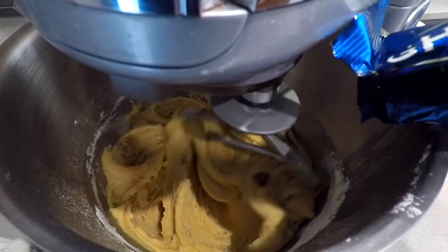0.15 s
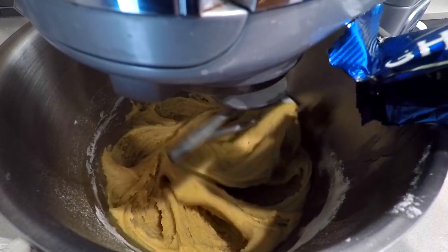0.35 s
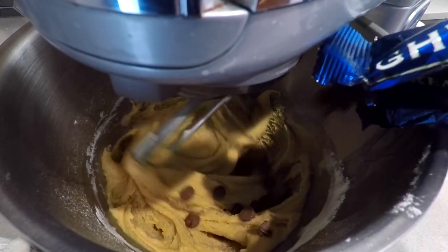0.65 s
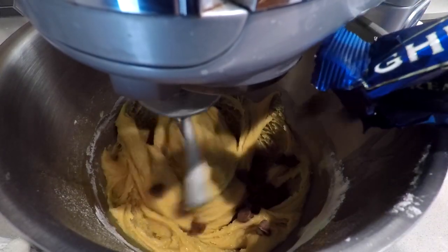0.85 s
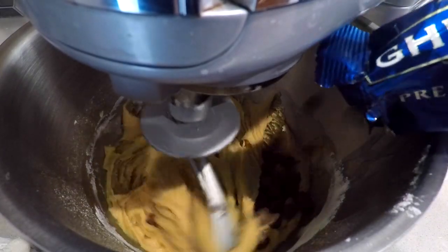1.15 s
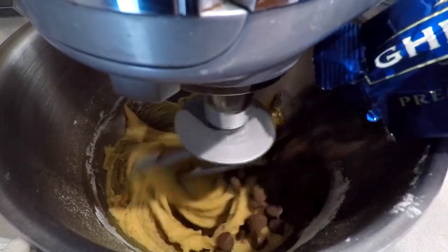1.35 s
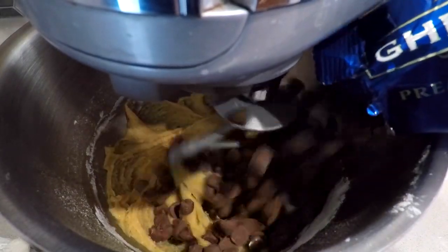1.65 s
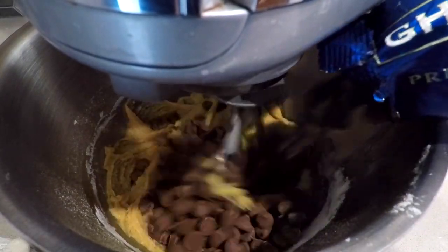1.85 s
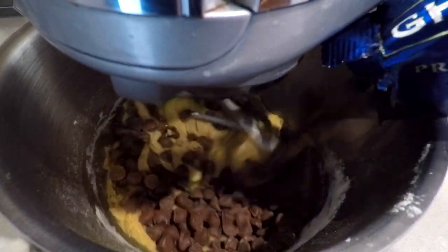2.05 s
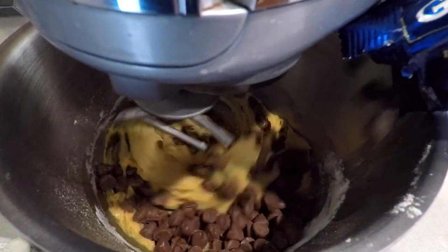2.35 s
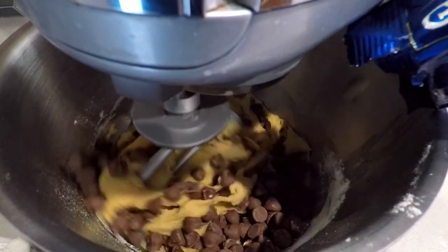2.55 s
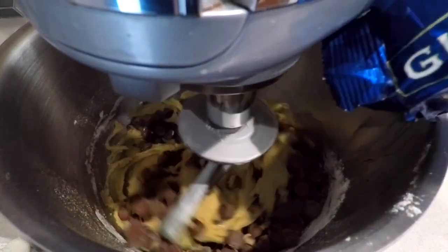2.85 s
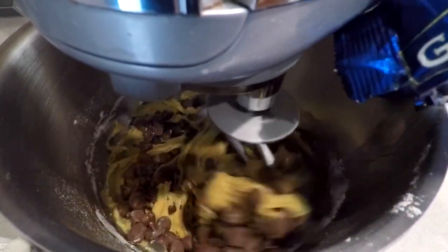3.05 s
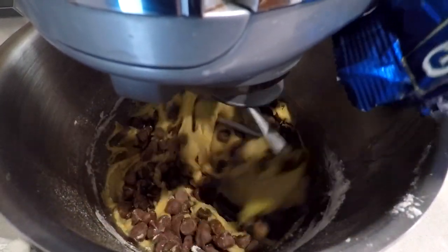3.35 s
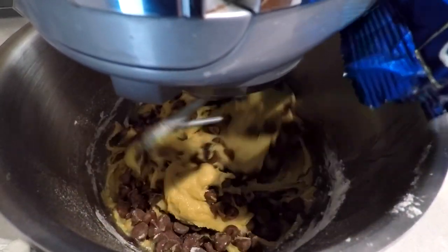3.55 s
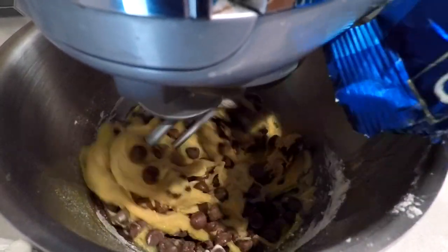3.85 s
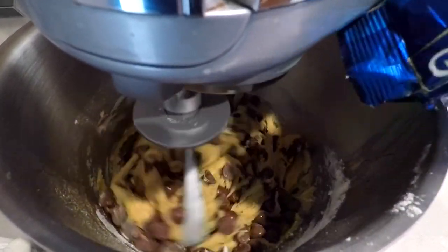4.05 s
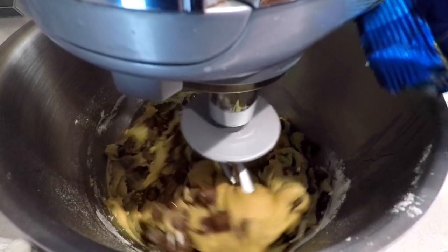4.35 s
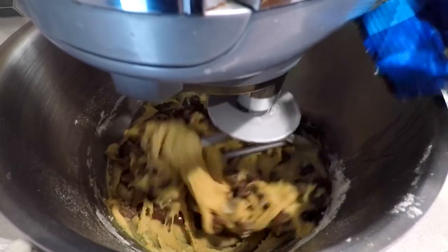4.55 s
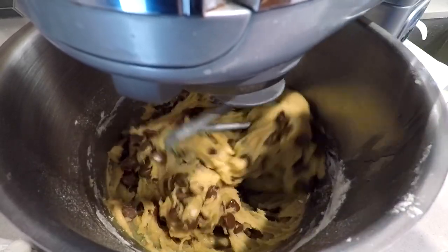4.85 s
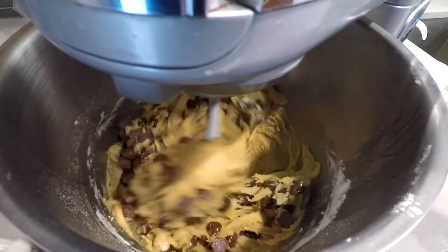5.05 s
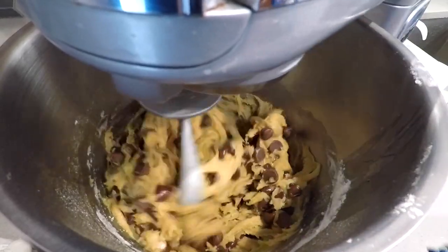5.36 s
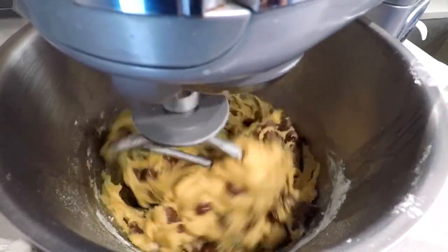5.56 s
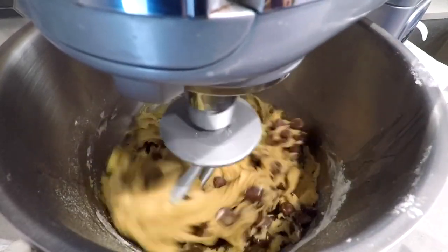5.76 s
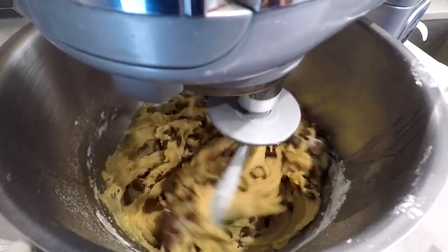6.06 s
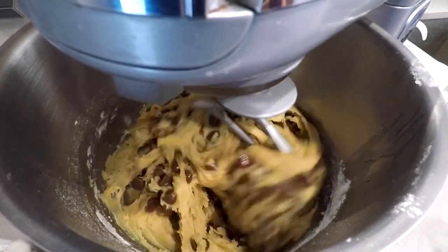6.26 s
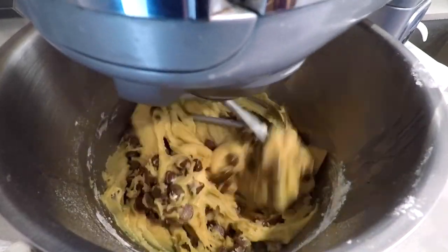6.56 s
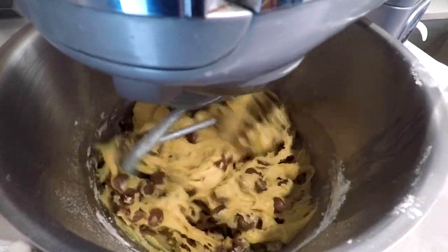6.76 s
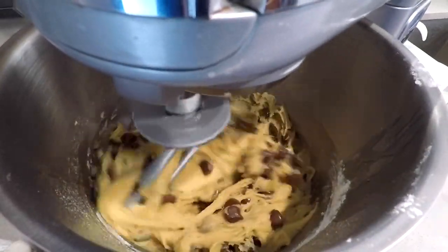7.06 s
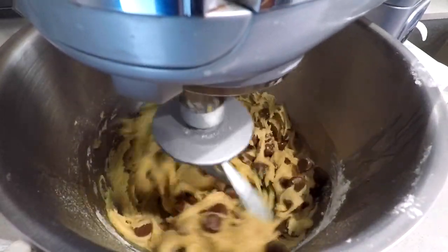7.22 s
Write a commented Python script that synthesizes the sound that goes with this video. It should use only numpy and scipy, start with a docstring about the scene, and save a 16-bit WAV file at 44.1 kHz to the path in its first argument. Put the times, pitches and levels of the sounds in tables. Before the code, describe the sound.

Electric mixer motor drones over churning dough; a crinkling bag pours chips in, then the labouring paddle knocks and cracks them against the metal bowl.

```python
"""A stand mixer beats thick dough in a steel bowl, close up, while chocolate chips are shaken in from a bag.
Motor: mains harmonics that throb and sag; gears: tooth-mesh tone with rasp; stand: filtered noise, thuds.
Dough: filtered noise, clicks and ticks. Foil and chips: short noise bursts at a pitch of their own. Chips
pinched by the paddle ring the damped bowl; the first chips make its rim sing; thin tones squeal. The sound
starts wide and narrows to the centre between about 1.5 and 2.7 s."""
import sys
import numpy as np
from scipy import signal
from scipy.fft import rfft, irfft
from scipy.io import wavfile

SR = 44100
rng = np.random.default_rng(int(sys.argv[2]) if len(sys.argv) > 2 else 0)


def unload_audio(sound):
    """Save the sound as a 16-bit wav file, at the path given as the first command line argument."""
    columns = np.transpose(np.atleast_2d(sound))
    # keep every value between -1 and 1, then stretch to whole-number steps
    steps = np.round(np.clip(columns, -1, 1) * 32767)
    wavfile.write(sys.argv[1], SR, steps.astype(np.int16))


N = 325899
T = np.arange(N) / SR
FREQS = np.fft.rfftfreq(N, 1 / SR)

MAINS_HZ, TOP_HZ = 60, 15200
STROKE_HZ, FIRST_STROKE_S = 4.415, .055  # paddle blade passing the bowl wall
START_TURN, MESH_TEETH, PINION_RATIO = -.13, 33, 3  # worm shaft and its gears
BITE_SAG, BITE_LAG_S, BITE_SLOW_S = .028, .0069, .03  # share of speed lost, delay, half length
DIP_DEPTH = .82

# Table levels are relative: the functions trim them. half_s is the time to 1/e of a Gaussian.
# Motor harmonics: mains_multiple, plain_dough_db, chip_heavy_dough_db
HUM_ORDERS = [(1, 13, -42.5), (2, 0, 1.5), (3, 3, -29.5), (4, -31.5, -24), (5, -28, -18.5), (6, -4.5, -29),
              (15, -73, -32)]
# Hum level: time_s, level_db
HUM_LEVEL = [(0.0, -17), (0.25, -16.5), (0.55, -17), (1.0, -15.5), (1.35, -20), (1.5, -27), (2.15, -28),
             (2.45, -20), (3.0, -13.0), (4.0, -14.5), (5.1, -14), (5.6, -14.5), (7.39, -14.5)]
# Load on the motor: time_s, load_0_to_1
MOTOR_LOAD = [(0, 0.54), (1.4, 0.59), (2.6, 0.96), (7.39, 0.81)]
# Brief hum drop-outs: time_s, half_s, stand_share (how far the stand goes quiet too)
HUM_DIPS = [(2.885, .02, 0), (3.087, .024, 0), (3.24, .03, .6), (3.44, .035, 0), (3.76, .015, 0),
            (3.869, .024, 0), (3.995, .04, .8), (4.119, .032, 0), (4.468, .027, .6), (4.865, .028, .6),
            (5.597, .033, .8), (5.69, .018, 0), (5.81, .032, .8), (6.15, .024, 0), (6.388, .027, 0),
            (6.5, .016, .3), (6.82, .018, .6), (7.305, .027, .3)]
# Worm shaft speed: time_s, turns_per_s
SHAFT_SPEED = [(0, 14.0), (.3, 14.05), (.45, 14.85), (.75, 14.9), (1.0, 14.4), (1.5, 14.35), (1.8, 14.65),
               (2.5, 14.5), (5.0, 14.7), (5.3, 14.5), (7.39, 14.65)]
# Gear whine: time_s, level_db
GEAR_LEVEL = [(0.0, -44), (0.25, -33.5), (0.7, -32.5), (1.15, -45.5), (1.9, -41), (2.45, -36),
              (3.05, -33.5), (3.65, -29.5), (4.0, -35.5), (4.7, -32.5), (5.1, -27), (5.4, -28), (5.75, -37),
              (6.15, -27.5), (6.5, -29), (7.1, -26.5), (7.39, -32.5)]
# Paddle bites into a lump, the gear tone swells or dips: time_s, gear_level_change_db
BITES = [(2.515, 14.5), (2.775, 9), (3.39, 9), (3.676, 5), (3.859, -4), (4.08, 7), (4.31, 15), (4.809, 10),
         (5.16, 9), (5.232, 16.5), (5.44, 8), (6.136, 12), (6.4, -12), (6.51, -4), (6.961, 1.5), (7.25, 4)]
# Drag of the dough lump on the paddle: time_s, drag_0_to_1
DOUGH_DRAG = [(2.4, 0.2), (3.0, 0.37), (4.05, 0.25), (4.3, 0.25), (4.5, 0.6), (5.05, 0.25), (5.7, 0.8),
              (5.95, 0.1), (6.3, 0), (7.0, 0.2), (7.39, 0.5)]
# Stand: time_s, shudder_db, kneading_db
SHOVE_LEVELS = [(0.0, -22.5, -26), (0.55, -22.5, -27.5), (0.85, -21, -28), (1.3, -20.5, -28),
                (1.8, -29.5, -34.5), (2.3, -31.5, -27.5), (2.58, -26.5, -25), (3.0, -20, -25.5),
                (3.3, -26.5, -25.5), (3.5, -21, -26), (4.15, -22.5, -25.5), (4.8, -30, -26.5),
                (5.55, -17.5, -24.5), (5.95, -24.5, -26), (6.42, -17.5, -22.5), (6.75, -21.5, -30),
                (7.02, -29.5, -28.5), (7.39, -24.5, -17)]
# Dough flops against the bowl: time_s, peak_db, pitch_hz, half_s
THUDS = [(1.184, -17.5, 223, 0.027), (1.213, -13, 52.7, 0.049), (1.478, -7, 51.2, 0.078),
         (2.071, -5, 64.7, 0.0095), (2.538, -13, 60.4, .02), (2.6, -18.5, 198, 0.028),
         (2.818, -15, 54, .04), (2.983, -11, 60, 0.026), (3.078, -17, 55, 0.026), (3.157, -16, 50, 0.023),
         (3.444, -9.5, 62, 0.044), (3.53, -15, 55, .025), (3.693, -14, 88, 0.04), (3.849, -14, 80.5, 0.023),
         (3.916, -10, 63, 0.022), (4.112, -10.5, 84, 0.024), (4.151, -9, 51.4, 0.033),
         (4.314, -17, 80, .012), (5.245, -12, 71, .03), (5.477, -9, 75, 0.024), (5.546, -12, 65, 0.017),
         (5.715, -8, 54, 0.049), (6.156, -8.5, 81, 0.019), (6.409, -9, 60, 0.015), (6.577, -12, 55, 0.032),
         (6.653, -24, 55, .015), (6.78, -4, 63, 0.013)]
# Churning dough: time_s, level_db
CHURN_LEVEL = [(0.0, -35.5), (0.72, -38), (0.88, -36), (1.42, -36.5), (1.7, -44), (1.95, -40.5), (2.1, -37),
               (2.22, -40), (2.6, -34.5), (3.0, -32), (3.2, -34.5), (3.85, -35), (4.7, -35.5),
               (5.55, -30.5), (5.85, -35), (6.15, -34.5), (6.4, -33), (7.1, -34.5), (7.3, -29.5)]
# Sticky crackle: time_s, level_db
STICKY_LEVEL = [(0, -50.5), (1.4, -36.5), (1.8, -40.5), (2.22, -43), (2.55, -40.5), (3.0, -38.5),
                (3.65, -40.5), (3.8, -40.5), (4.25, -41), (4.5, -40), (4.9, -40), (5.25, -37.5),
                (5.65, -43.5), (6.25, -44), (6.38, -40.5), (6.5, -39.5), (6.9, -35), (7.12, -43),
                (7.26, -32), (7.39, -36)]
# Bag crinkle and chip patter: time_s, level_db
POUR_LEVEL = [(0.0, -38), (0.2, -40), (0.3, -36.5), (0.45, -35), (0.7, -42.5), (0.85, -35.5), (1.1, -36.5),
              (1.22, -34.5), (1.42, -26), (1.62, -34.5), (1.9, -31)]
# Spectrum of the stand's shudder: freq_hz, gain_db
SHUDDER_SPECTRUM = [(15, -37.5), (32, -5.5), (47, -5.5), (60, 1.5), (72, -10.5), (100, -4), (135, -13.5),
                    (170, -15.5), (300, -81.5)]
# Spectrum of kneading: freq_hz, gain_db
KNEAD_SPECTRUM = [(70, -42.5), (140, 5.5), (190, -2), (260, -9), (310, -4.5), (385, -11.5), (520, -2.5),
                  (650, -27.5), (1000, -60.5)]
# Spectrum of churning: freq_hz, gain_db
CHURN_SPECTRUM = [(300, 6.5), (560, 0.5), (680, 5), (790, -4.5), (910, 7.5), (1050, 3), (1300, 1.5),
                  (1480, 0.5), (1660, 3), (1950, 0), (2600, -6.5), (3400, -17), (4500, -17.5),
                  (9000, -34.5)]
# Spectrum of sticky smacks: freq_hz, gain_db
STICKY_SPECTRUM = [(1200, -1), (2500, 1.5), (3400, 9), (4200, 0), (5000, -1), (6100, 1), (7500, -4.5),
                   (9500, -11.5), (11500, -21.5), (13000, -16), (15000, -44.5)]
# Spectrum of bag and patter: freq_hz, gain_db
CRINKLE_SPECTRUM = [(900, 1), (2200, 0), (3400, 4), (4600, 2), (5700, 4.5), (7200, -1), (8600, -39),
                    (11500, -48), (15000, -53)]
# Spectrum of brittle cracks: freq_hz, gain_db
CRACK_SPECTRUM = [(500, 0), (1200, 3.5), (2500, 3.5), (3500, 2.5), (4700, 1.5), (6300, 4.5), (8000, -2.5),
                  (10500, -18), (15000, -32)]
# Paddle pinches a chip against the bowl: time_s, peak_db, centre_hz
KNOCKS = [(1.095, -18, 2500), (2.064, -16, 1660), (2.407, -20, 920), (2.602, -13, 1590),
          (3.649, -12.5, 1530), (3.887, -17.5, 1980), (3.926, -14.5, 1240), (4.097, -18, 950),
          (4.474, -14, 1950), (4.707, -13.5, 1680), (5.08, -14, 1700), (5.555, -8.5, 1620),
          (6.356, -14.5, 1400), (6.432, -12, 1590), (6.646, -14, 1460), (6.782, -15.5, 1240),
          (6.889, -15.5, 2320), (6.94, -16.5, 1870), (7.24, -22, 1520)]
# Modes of the bowl damped by dough: freq_hz, level_db, t60_s
DAMPED_BOWL = [(903, -6, 0.25), (1000, -55, 0.0086), (1280, -26, 0.018), (1530, 6, 0.047),
               (1670, 9.5, 0.036), (1730, -12, 0.0085), (2025, -10.5, 0.018), (2420, 3, 0.011),
               (3380, -2, 0.031)]
# Modes of the bowl singing freely: freq_hz, level_db, t60_s
SINGING_BOWL = [(918, 3, 0.41), (864, -11, 0.59), (1410, -12, 0.41), (3500, -19, .15)]
# First chips drop on bare steel: time_s, peak_db
DROPS = [(1.11, -23.5), (1.35, -22), (1.445, -23), (1.56, -28.5)]
# Foil bag snaps: time_s, peak_db, centre_hz
FOIL_SNAPS = [(0.0243, -15, 4060), (0.1214, -16.5, 3470), (0.1565, -22, 4770), (0.1845, -12.5, 4080),
              (0.1906, -15, 6700), (0.2096, -17, 5610), (0.4125, -19, 6110), (0.46, -18, 5900),
              (0.622, -18, 5000), (0.7223, -28, 2990), (0.8117, -13.5, 3100), (0.8492, -11.5, 3640),
              (0.8729, -14.5, 3770), (0.9202, -15, 2420), (0.9637, -21.5, 3390), (0.9926, -20.5, 5500),
              (1.0176, -17, 4020), (1.0355, -10, 4900), (1.0965, -8.5, 3670), (1.1189, -14.5, 3420),
              (1.172, -11, 3370)]
# Chips crack against steel: time_s, peak_db, centre_hz
CHIP_CRACKS = [(1.3014, -24, 3190), (1.3179, -17, 2100), (1.3468, -18, 3500), (1.3748, -14.5, 3770),
               (1.4062, -25, 4390), (1.4346, -15, 4380), (1.449, -18, 3530), (1.49, -25, 3700),
               (1.5544, -16, 4130), (1.594, -28, 3500), (1.6322, -16.5, 3330), (1.6854, -21, 5870),
               (1.716, -27, 5500), (1.732, -28, 3430), (2.4409, -20.5, 3380), (2.4736, -23, 3270),
               (2.5473, -22.5, 2670), (2.6713, -20, 3520), (2.7801, -21.5, 3060), (2.931, -21.5, 3700),
               (3.0071, -16.5, 2970), (3.1248, -21, 3330), (3.2058, -22, 2980), (3.3837, -20, 3230),
               (3.4885, -13, 3570), (3.8038, -18, 3100), (4.4774, -25.5, 3240), (4.6356, -32, 3540),
               (4.6972, -16.5, 3680), (5.0604, -19.5, 2980), (5.2205, -17, 2940), (5.2455, -15.5, 3720),
               (5.8147, -22, 3730), (5.9955, -28, 4800), (6.3649, -19.5, 4500), (6.8324, -22.5, 2810),
               (6.9396, -23, 3040), (7.2404, -18, 2640)]
# Squeals as chips slide out: time_s, peak_db
SQUEALS = [(0.02, -43.5), (1.485, -34.5), (1.525, -31.5), (1.569, -26.5), (1.654, -26), (1.693, -24)]
# Squeal tones: freq_hz, level_db
SQUEAL_TONES = [(7673, 3.5), (13624, -20)]
# Difference between the two microphones: freq_hz, side_minus_mid_db
SIDE_SPECTRUM = [(60, -8.5), (120, -4.5), (190, 10), (380, 10.5), (520, 10), (700, 7), (920, 5),
                 (1280, -1.5), (2350, -4.5), (4330, -9), (8000, 1.5), (14700, -1)]
# Stereo width: time_s, width_db
WIDTH_LEVEL = [(0, -2), (1.5, -0.5), (1.75, -3), (2.0, -13.5), (2.3, -20.5), (2.7, -70)]


def amp(db):
    """Decibels to gain."""
    return 10 ** (np.asarray(db) / 20)


def unit(x):
    """Scales to an rms of one."""
    return x / np.sqrt(np.mean(x ** 2) + 1e-20)


def curve(rows, axis=1):
    """One column of a time table at every sample."""
    rows = np.asarray(rows, float)
    return np.interp(T, rows[:, 0], rows[:, axis])


def bump(time_s, half_s):
    """Gaussian pulse of height one."""
    return np.exp(-((T - time_s) / half_s) ** 2)


def shape(points, hz):
    """Gain of a spectrum table at the given frequencies."""
    f, db = np.transpose(points)
    return amp(np.interp(np.log(hz + 1), np.log(f), db))


def colour(x, points, size=8192):
    """Causal minimum-phase filter: clicks keep their sharp fronts."""
    log_gain = np.log(shape(points, abs(np.fft.fftfreq(size, 1 / SR))))
    response = np.fft.ifft(np.exp(np.conj(signal.hilbert(log_gain)))).real
    return signal.oaconvolve(x, response[:size // 2])[:len(x)]


def wander(hz, size=8192):
    """Slow random drift of rms one, up to about hz changes a second."""
    step_s = N / SR / size
    rolloff = 1 + (np.fft.rfftfreq(size, step_s) / hz) ** 4
    slow = irfft(rfft(rng.standard_normal(size)) / rolloff)
    return np.interp(T, np.arange(size) * step_s, unit(slow))


def grains(per_s, spread_db):
    """Random clicks, most small and a few large."""
    size = amp(spread_db * np.minimum(rng.exponential(1, N), 4.5))
    present = rng.random(N) < per_s / SR
    return unit(size * rng.choice([-1, 1], N) * present)


def ticks(per_s, spread_db, low_hz, high_hz, cycles=3.5, count=22):
    """Little ticks, each ringing for a few cycles at one of count pitches."""
    out = np.zeros(N)
    for hz in np.geomspace(low_hz, high_hz, count):
        pole = np.exp((2j * np.pi - 1 / cycles) * hz / SR)
        clicks = grains(per_s / count, spread_db)
        ringing = signal.lfilter([1, 0, -1], [1, -2 * pole.real, abs(pole) ** 2], clicks)
        out += np.sqrt(hz) * unit(ringing)
    return unit(out)


def resonate(x, hz, width_hz):
    """Resonance of gain one that can follow a moving pitch."""
    turn = np.exp(2j * np.pi * np.cumsum(hz * np.ones(len(x))) / SR)
    r = np.exp(-np.pi * width_hz / SR)
    return 2 * (turn * signal.lfilter([1 - r], [1, -r], x / turn)).real


def resonate_twice(x, hz, width_hz, second_width_hz):
    """Two resonances in series, scaled to rms one."""
    return unit(resonate(resonate(x, hz, width_hz), hz, second_width_hz))


def modes(rows, t):
    """Sum of exponentially decaying sine modes."""
    return sum(amp(db - 60 * t / t60_s) * np.sin(2 * np.pi * hz * t) for hz, db, t60_s in rows)


def add(mix, time_s, sound):
    """Mixes a sound in at a given time."""
    part = mix[max(round(time_s * SR), 0):][:len(sound)]
    part += sound[:len(part)]


def echoes(x, t60_s, size=12000):
    """Dense reflections that die away, as a decaying noise tail."""
    t = T[:size]
    tail = rng.standard_normal(size) * amp(-60 * t / t60_s) * (t > .0008)
    return signal.oaconvolve(x, tail / np.linalg.norm(tail))[:N]


def scatter(levels, count, over_db, spread_db=3, low_hz=2700, high_hz=6200):
    """Random snaps following a level curve: time_s, peak_db, centre_hz."""
    s, db = np.transpose(levels)
    when, size, pitch = rng.random((count, 3)).T
    when = s[0] + (s[-1] - s[0]) * (np.arange(count) + when) / count
    peak_db = np.interp(when, s, db) + over_db + spread_db * (2 * size - 1)
    return list(zip(when, peak_db, low_hz * (high_hz / low_hz) ** pitch))


def stroke(per_stroke=1, late_s=0):
    """Swings between -1 and 1 as the paddle blades sweep past the bowl wall."""
    return np.cos(2 * np.pi * per_stroke * STROKE_HZ * (T - FIRST_STROKE_S - late_s))


def shaft_turns():
    """Turns of the worm shaft since the start; each bite slows it a little."""
    slowing = sum(bump(s + BITE_LAG_S, BITE_SLOW_S) for s, _ in BITES)
    return START_TURN + np.cumsum(curve(SHAFT_SPEED) * (1 - BITE_SAG * slowing)) / SR


def dips(hum_only):
    """Gain of the brief drop-outs, for the hum or for the stand."""
    gain = np.ones(N)
    for s, half_s, stand_share in HUM_DIPS:
        share = 1 if hum_only else stand_share
        gain *= 1 - DIP_DEPTH * share * bump(s, half_s)
    return gain


def bag_rub():
    """Foil rubs on itself in one short chirp: resonant noise in a Gaussian pulse."""
    chirp = resonate_twice(rng.standard_normal(N), 5650, 600, 600)
    return amp(-17) * bump(.485, .0029) * chirp


def pour(stop_s=1.74, fade_s=.12):
    """Bag crinkles and chips patter in, as ticks and clicks in quick clumps, until it is empty."""
    crinkle = ticks(1100, 4.0, 2200, 7500, cycles=2.0)
    crinkle += 1.2 * grains(420, 4.2) + .3 * rng.standard_normal(N)
    crinkle *= amp(2.0 * wander(60))
    fade = np.clip((stop_s - T) / fade_s, 0, 1)
    return fade * amp(curve(POUR_LEVEL)) * unit(colour(crinkle, CRINKLE_SPECTRUM))


def squeal(half_s=.014, skirt_s=.053, skirt_db=-17):
    """Two thin, unsteady tones swell with each slip over a faint skirt that rises before and fades after."""
    tones, slips = np.zeros(N), np.zeros(N)
    for hz, db in SQUEAL_TONES:
        tones += amp(db + 3.7 * wander(60)) * np.sin(2 * np.pi * hz * T + 1.1 * wander(38))
    for s, db in SQUEALS:
        slips += amp(db) * (bump(s, half_s) + amp(skirt_db) * np.exp(-abs(T - s) / skirt_s))
    return np.sqrt(2) * slips * tones


def bowl_song(size=22000):
    """Falling chips set the rim swinging in its free modes."""
    out, ring = np.zeros(N), modes(SINGING_BOWL, T[:size])
    for s, db in DROPS:
        add(out, s, amp(db) * ring)
    return out


def snaps(rows, crack_s, tail, level_db, sheen_db, width_hz=600, ring=.63, size=3000):
    """Brittle cracks: a sharp, bright first instant, crumbs falling and a short pitched ring."""
    t, out = T[:size], np.zeros(N)
    for s, db, hz in rows:
        crack = rng.standard_normal(size) * (np.exp(-t / crack_s) + tail * np.exp(-t / .01))
        front = rng.standard_normal(size) * np.exp(-t / .0015)
        body = unit(crack) + ring * unit(resonate(crack, hz, width_hz))
        sound = unit(colour(body, CRACK_SPECTRUM)) + amp(sheen_db) * unit(front)
        add(out, s, amp(db + level_db) * sound / abs(sound).max())
    return out


def foil_snaps():
    """Foil snaps short and dry, with few crumbs."""
    rows = list(FOIL_SNAPS) + scatter(POUR_LEVEL, count=36, over_db=10.5)
    return snaps(rows, crack_s=.0018, tail=.12, level_db=1.5, sheen_db=-21.5)


def chip_cracks():
    """Chips crack on steel a little longer than foil and crumble more."""
    rows = list(CHIP_CRACKS) + scatter(STICKY_LEVEL, count=18, over_db=7.5)
    return snaps(rows, crack_s=.0028, tail=.25, level_db=3.5, sheen_db=-26.5)


def knocks(width_hz=450, size=7000):
    """Each pinched chip crumbles at its own pitch, rings the bowl and thumps the dough."""
    t, out = T[:size], np.zeros(N)
    ring = modes(DAMPED_BOWL, t)
    decay = np.exp(-t / .006) + .52 * np.exp(-t / .016)  # blow, then crumbling tail
    for s, db, hz in KNOCKS:
        crush = rng.standard_normal(size) * decay
        sound = .8 * resonate_twice(crush, hz, width_hz, 2 * width_hz)
        sound += amp(1.5) * unit(signal.fftconvolve(crush, ring)[:size])
        sound += .7 * unit(colour(crush, CHURN_SPECTRUM))
        thump = colour(crush, KNEAD_SPECTRUM)
        knock = sound / abs(sound).max() + amp(-1.0) * thump / abs(thump).max()
        add(out, s, amp(db + .5) * knock)
    return out


def dough(churn_trim_db=3.0, stroke_db=.76):
    """Dough churns with an even rasp and unsticks in tiny smacks, a little more at each stroke."""
    churn = .8 * grains(2000, 3) + .4 * ticks(1500, 3, 700, 4500) + rng.standard_normal(N)
    churn *= amp(1.3 * wander(20))
    smacks = ticks(1200, 2.8, 2500, 13000) + .55 * grains(500, 3.6) + 1.4 * rng.standard_normal(N)
    smacks *= amp(1.7 * wander(30))
    out = amp(curve(CHURN_LEVEL) + churn_trim_db) * unit(colour(churn, CHURN_SPECTRUM))
    out += amp(curve(STICKY_LEVEL)) * unit(colour(smacks, STICKY_SPECTRUM))
    return out * amp(stroke_db * stroke())


def contents():
    """Everything that sounds in and above the bowl, with a little kitchen echo."""
    direct = dough() + pour() + knocks() + foil_snaps() + chip_cracks() + squeal()
    return amp(-1.0) * direct + amp(-10.5) * echoes(direct, t60_s=.093)


def stand(shudder_trim_db=3.5, light_db=-7.0, lowest_hz=40):
    """Stand shudders as the paddle shoves the dough; kneading is softer in light dough; lumps thud."""
    load, shove = curve(MOTOR_LOAD), curve(DOUGH_DRAG) * stroke()
    shudder = unit(colour(rng.standard_normal(N), SHUDDER_SPECTRUM))
    shudder = unit(np.tanh(shudder))
    shudder *= amp(curve(SHOVE_LEVELS) + shudder_trim_db + 4.5 * shove)
    highpass = signal.butter(4, lowest_hz, "high", fs=SR, output="sos")
    out = signal.sosfilt(highpass, shudder)
    lumps_db = 2.5 * shove + 2.5 * load * wander(12)
    knead_db = curve(SHOVE_LEVELS, axis=2) + light_db * (1 - load) + lumps_db
    out += amp(knead_db) * unit(colour(grains(900, 1.17), KNEAD_SPECTRUM))
    out *= dips(hum_only=False)
    for s, db, hz, half_s in THUDS:
        out += amp(db) * bump(s, half_s) * np.sin(2 * np.pi * hz * (T - s))
    return out


def gears(width_hz=75, swing_hz=7, bite_half_s=.014, evening=.97, shaft_depth=1.0, pinion_depth=.99):
    """Meshing teeth sing in the housing; level follows shaft turn, pinion turn and each bite."""
    load, turns = curve(MOTOR_LOAD), shaft_turns()
    throb, mesh_hz = np.cos(2 * np.pi * turns), MESH_TEETH * curve(SHAFT_SPEED)
    pinion = np.cos(2 * np.pi * PINION_RATIO * turns)
    rasp = resonate_twice(rng.standard_normal(N), mesh_hz, width_hz, width_hz)
    bend = np.cumsum(swing_hz * throb + 4 * load * wander(6.43)) / SR  # speed swings within each turn
    mesh = np.sin(2 * np.pi * (MESH_TEETH * turns + bend) + .2 * wander(18)) + .27 * load * rasp
    free = 1 - evening * load ** 2  # load presses the teeth together and evens out the throb
    swell = (1 + free * shaft_depth * throb) * (1 + free * pinion_depth * pinion)
    bites_db = sum(db * bump(s, bite_half_s) for s, db in BITES)
    level_db = curve(GEAR_LEVEL) + 2.0 + bites_db + load * 2.5 * wander(2.6)
    return amp(level_db) * unit(mesh * swell)


def hum(throb=.2, lag_turns=.4, sag=.88, sag_late_s=.043, slip_s=.022, slip_lead_s=.0089):
    """Mains harmonics; the second throbs with the shaft and sags twice a stroke when dough drags."""
    load, out = curve(MOTOR_LOAD), np.zeros(N)
    push = ((1 - stroke(2, sag_late_s + .006 * wander(5))) / 2) ** 2
    sway = 1 + throb * (1 - load) * np.cos(2 * np.pi * (shaft_turns() - lag_turns)) + .11 * wander(16)
    sway -= sag * curve(DOUGH_DRAG) * (1 + .52 * wander(1.3)) * (push - push.mean())
    sway *= dips(hum_only=True)
    slip = np.zeros(N)  # where the stand shakes on, the hum bends down by one cycle
    for s, _, stand_share in HUM_DIPS:
        if stand_share == 0:
            slip -= np.pi * (1 + np.tanh((T - s + slip_lead_s) / slip_s))
    for k, light_db, heavy_db in HUM_ORDERS:
        size = sway if k == 2 else 1 + .61 * load ** 2 * wander(13.7)
        phase = 2 * np.pi * k * MAINS_HZ * T + (k == 2) * slip
        phase += .12 * k ** .7 * load ** 2 * wander(9)
        out += amp(light_db + load * (heavy_db - light_db)) * size * np.sin(phase)
    return np.sqrt(2) * amp(curve(HUM_LEVEL) - .47) * out


def microphones(mid, scattered, rim, diffuse_hz=1000):
    """Low vibration reaches two microphones out of step, the treble scattered; the width closes."""
    direct, width = 1 / (1 + (FREQS / diffuse_hz) ** 6), amp(curve(WIDTH_LEVEL))
    side = 1j * np.sqrt(direct) * rfft(width * mid)  # side a quarter cycle from mid
    side += np.sqrt(1 - direct) * rfft(width * scattered)
    side = irfft(side * shape(SIDE_SPECTRUM, FREQS), N)
    side += width * rim  # the rim moves in opposite ways on each side
    return np.array([mid + side, mid - side])


def scene():
    """Machine and bowl, heard directly and scattered off the steel wall (a second random draw)."""
    rim = bowl_song()
    mid = hum() + gears() + stand() + contents() + bag_rub() + amp(-18.0) * rim
    return microphones(mid, contents(), rim)


def record(dry, ceiling=1.0):
    """Rounds off the largest peaks, then limits the band."""
    rounded = dry / (1 + (dry / ceiling) ** 6) ** (1 / 6)
    lowpass = signal.firwin(401, TOP_HZ, window=("kaiser", 9), fs=SR)
    return signal.oaconvolve(rounded, lowpass[None], "same", axes=1)


dry = scene()
out = record(dry)
unload_audio(out)
```